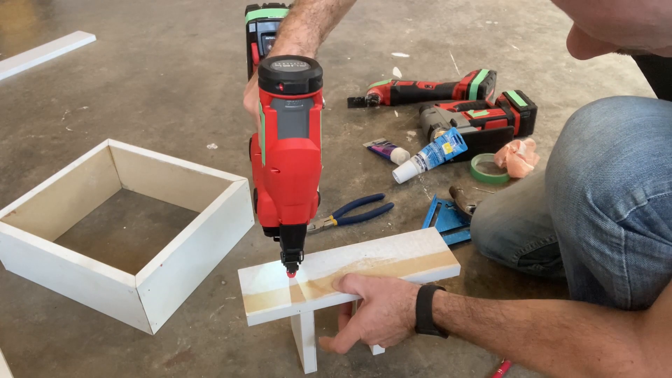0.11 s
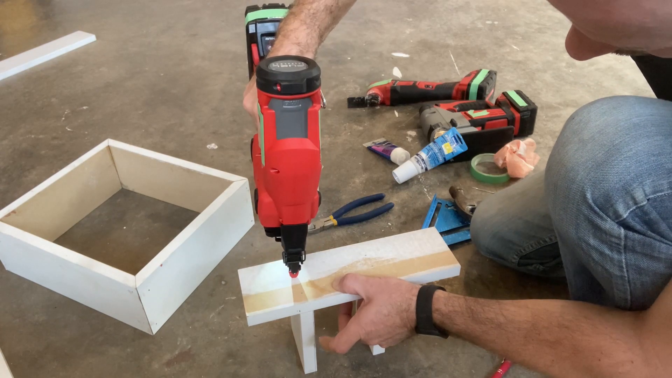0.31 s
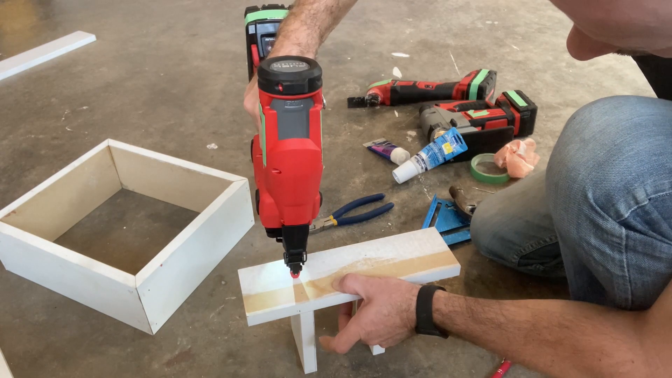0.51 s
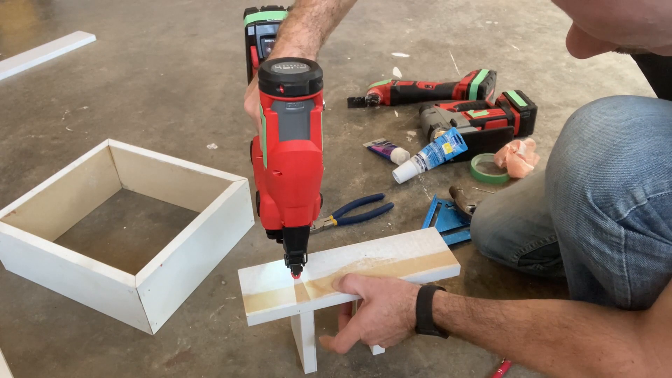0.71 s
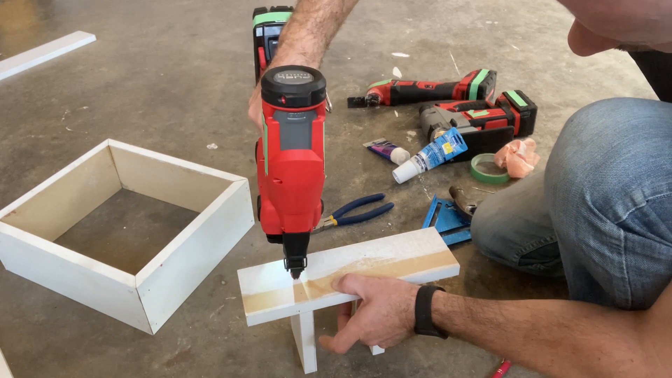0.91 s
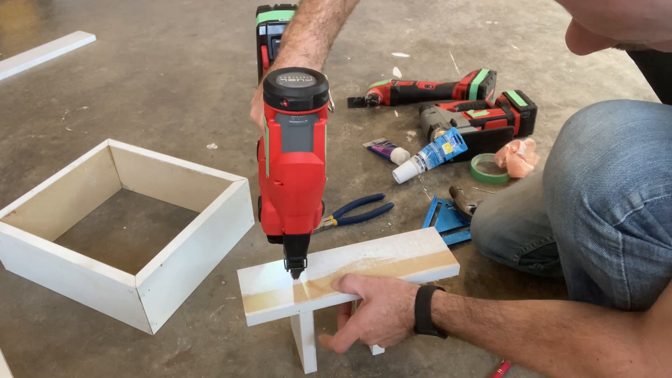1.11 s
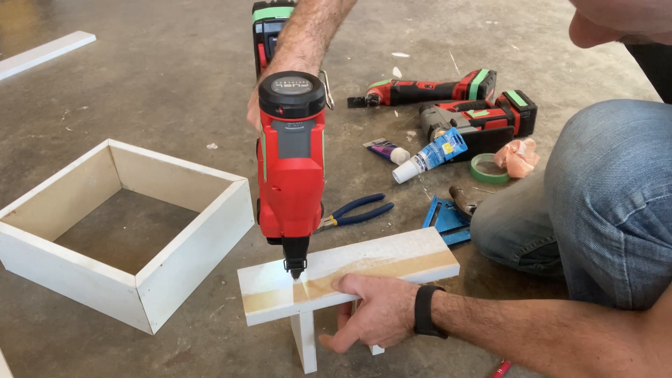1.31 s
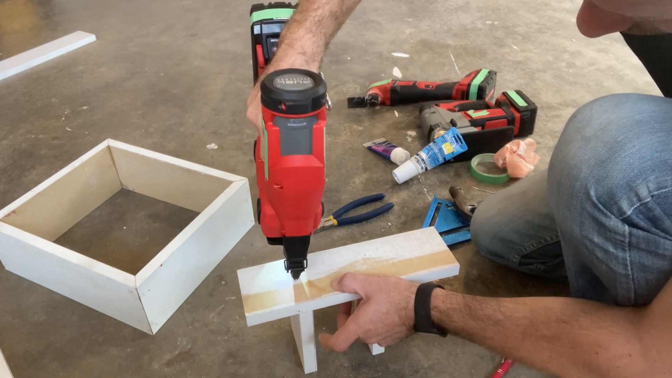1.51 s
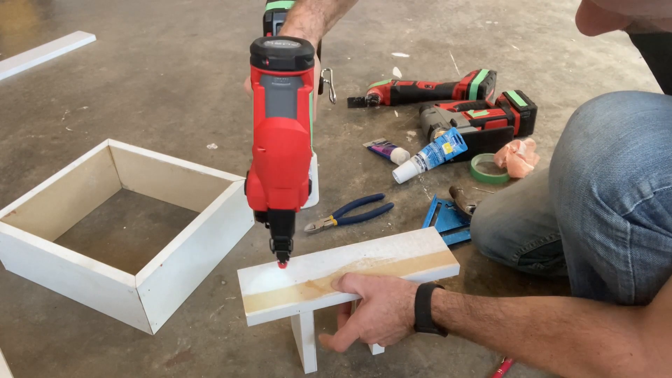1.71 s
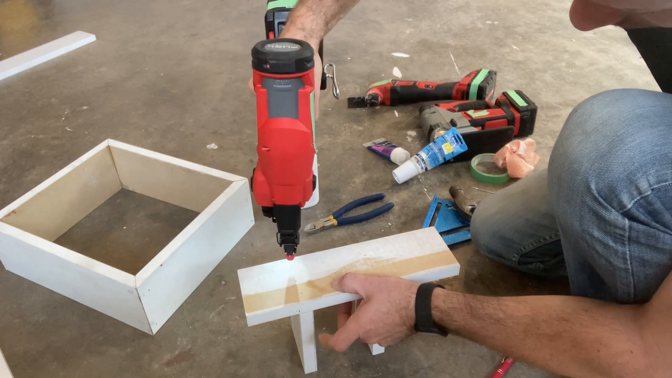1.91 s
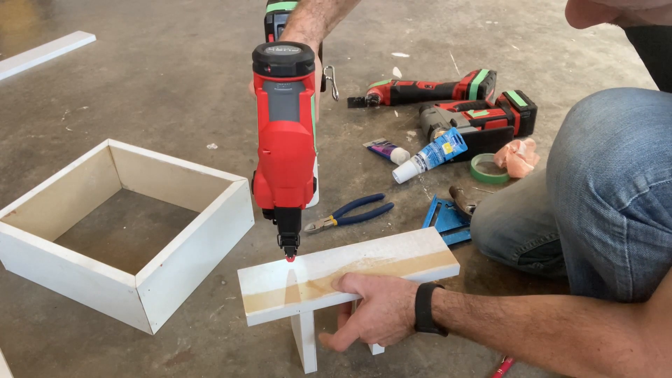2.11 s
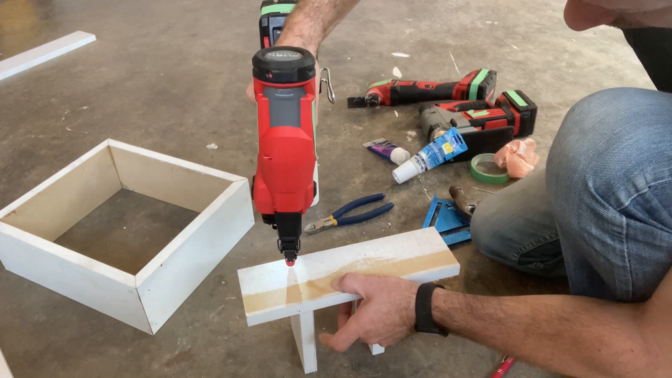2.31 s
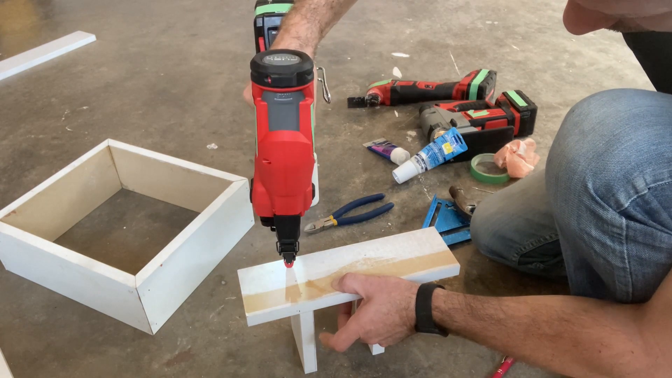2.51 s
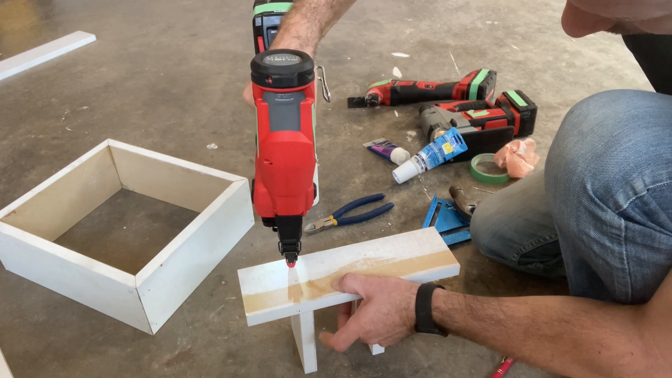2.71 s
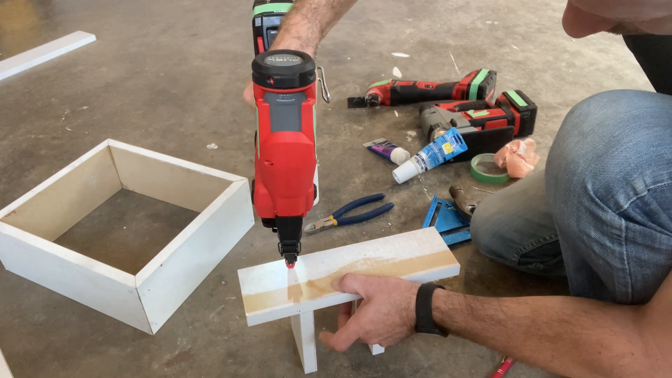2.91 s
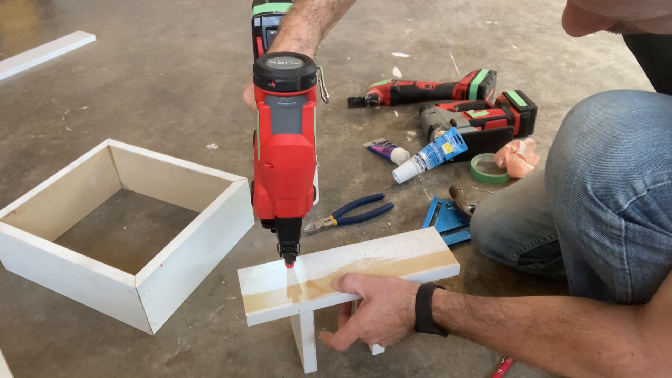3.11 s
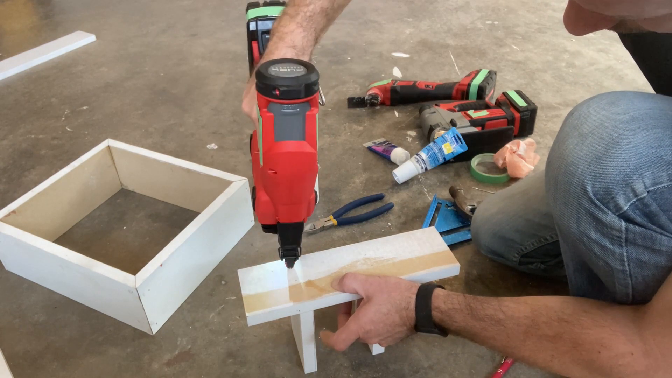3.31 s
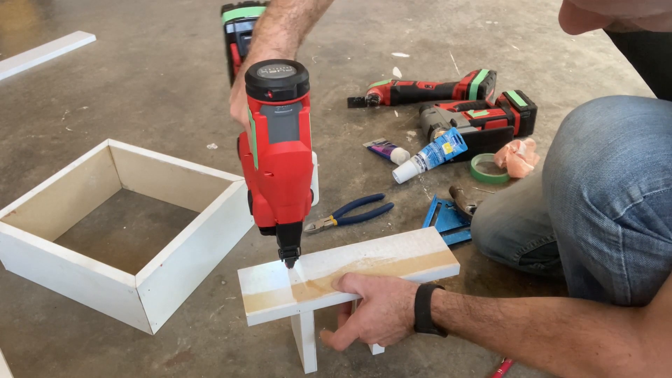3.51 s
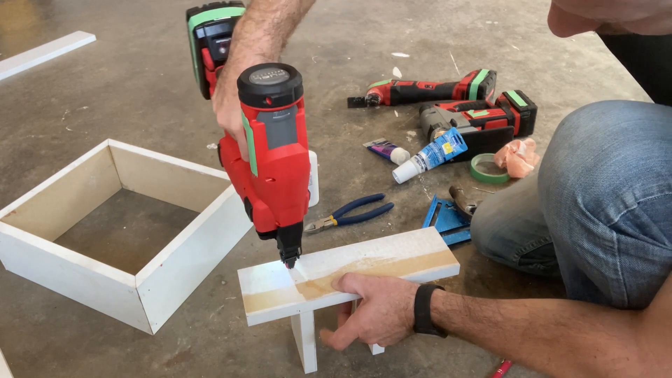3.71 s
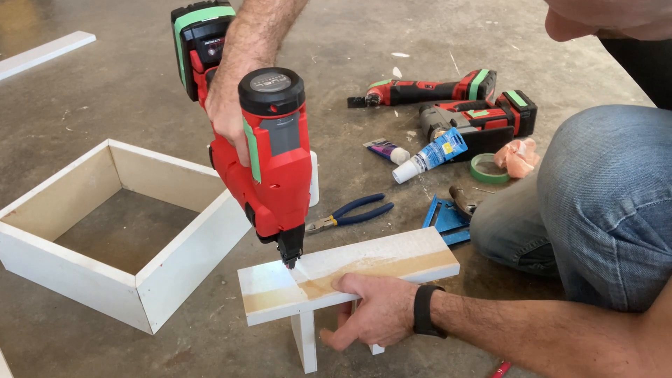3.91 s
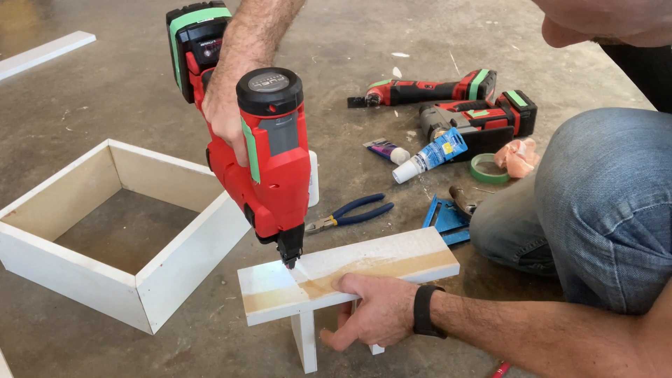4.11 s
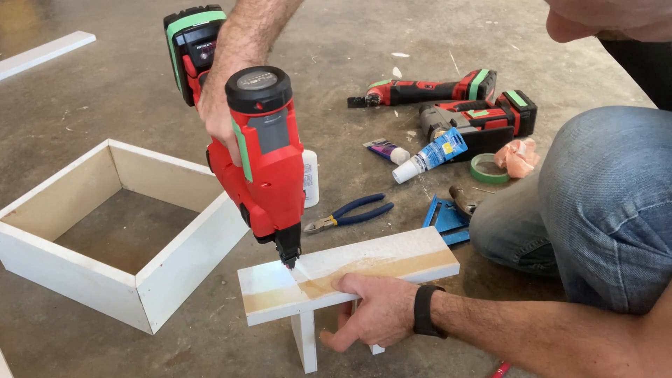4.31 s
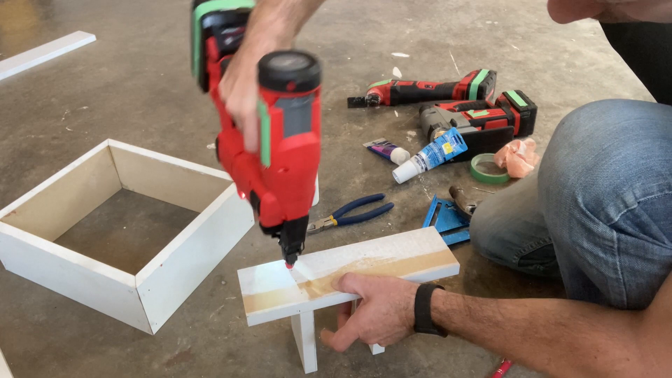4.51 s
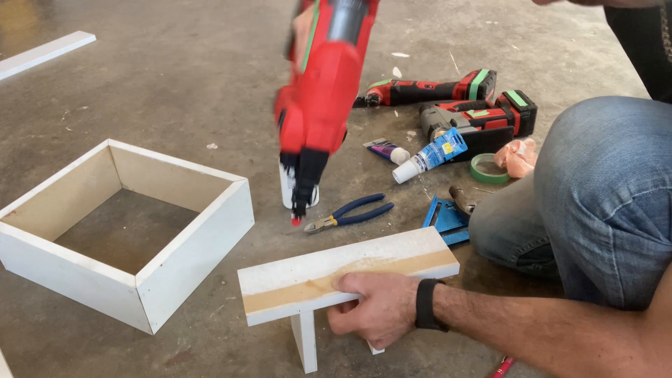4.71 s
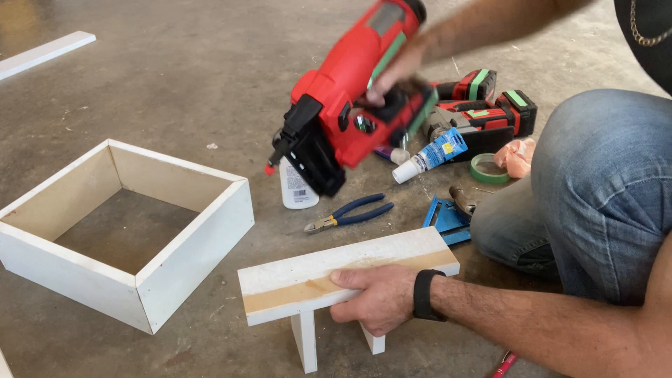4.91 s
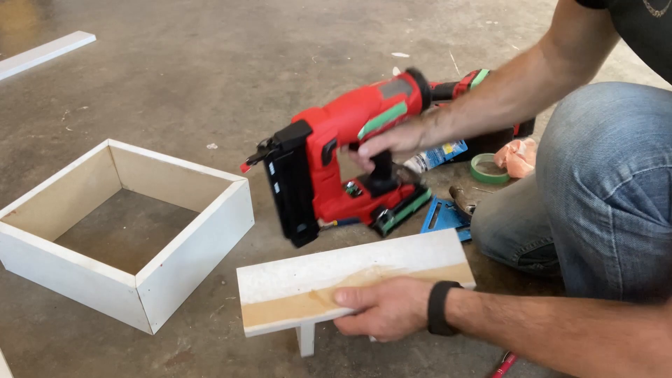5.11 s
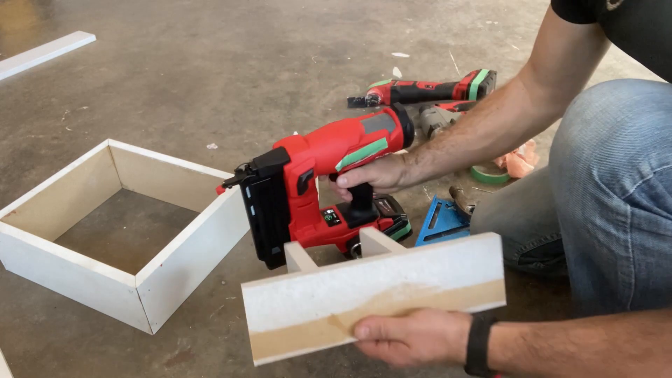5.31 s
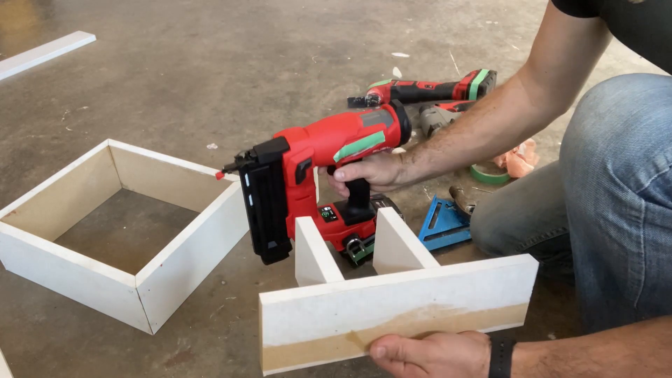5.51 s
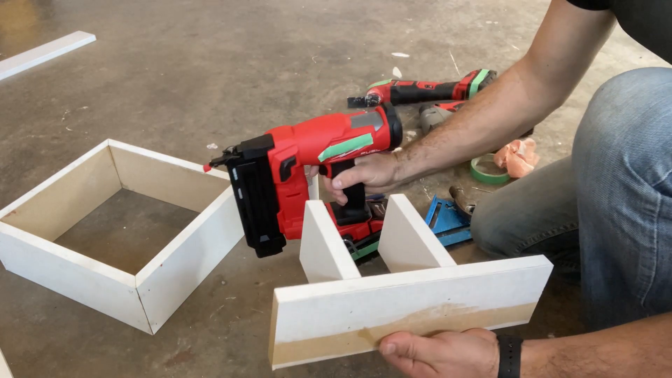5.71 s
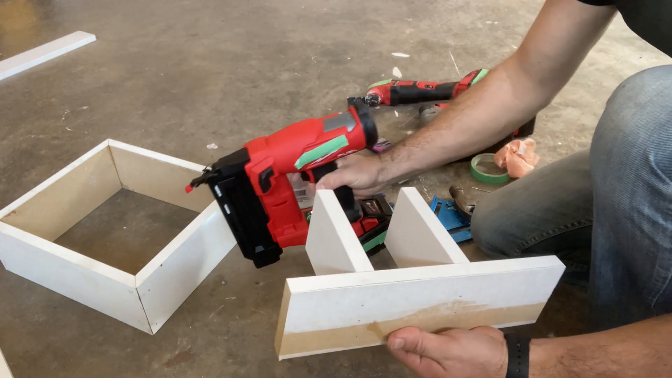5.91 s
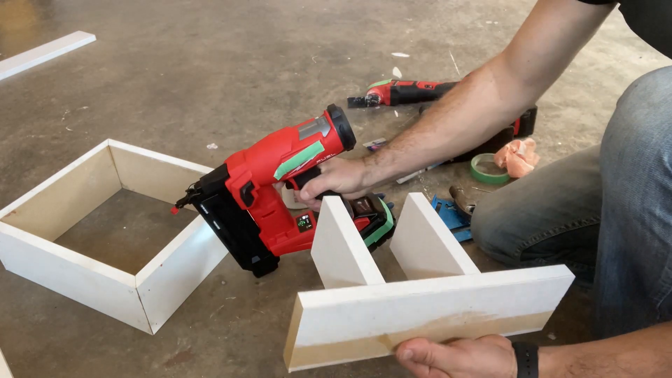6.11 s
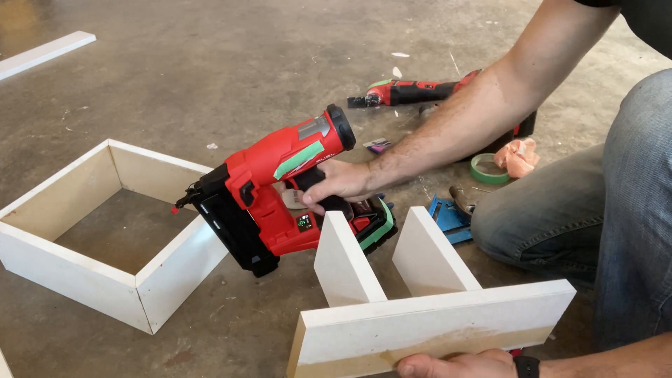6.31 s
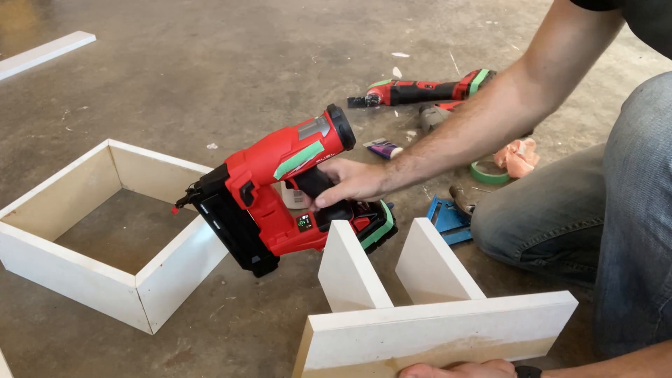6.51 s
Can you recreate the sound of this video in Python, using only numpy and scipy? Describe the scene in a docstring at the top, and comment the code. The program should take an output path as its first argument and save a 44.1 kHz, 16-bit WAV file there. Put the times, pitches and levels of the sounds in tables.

```python
"""A bare, echoing room with a concrete floor, still air and a faint hum; a cordless nailer close to two microphones.
First the plastic shell clicks in the hand, and the nose knocks and scuffs on a wooden frame.
A trigger click, then a shot: the drive kicks in, the driver slams, gears rattle, the mechanism snaps, runs on and
stops with a clack. More clicks and knocks lead to a second shot; then tool and frame bump and slide on the floor.
Each echo is filtered noise; a limiter holds the shots down and lets the echo swell back up."""
import sys
import numpy as np
from scipy import signal
from scipy.fft import rfft, irfft, next_fast_len
from scipy.io import wavfile
from scipy.ndimage import uniform_filter1d, minimum_filter1d

SR = 44100
rng = np.random.default_rng(int(sys.argv[2]) if len(sys.argv) > 2 else 0)


def wrap_up_sound(samples):
    """Save the sound to the file named by the first command line argument, as 16-bit audio."""
    columns = np.atleast_2d(samples).T
    # keep every value between -1 and 1, then stretch to whole-number steps
    tamed = np.clip(columns, -1, 1)
    steps = np.round(tamed * 32767).astype(np.int16)
    wavfile.write(sys.argv[1], SR, steps)


N = 288855


def amp(db):
    """Turns dB into an amplitude factor."""
    return 10 ** (np.asarray(db) / 20)


def evened(x):
    """Scales to rms 1."""
    return x / np.sqrt(np.mean(x ** 2) + 1e-20)


def read(points, hz):
    """Reads a table on a log-frequency axis."""
    f, value = np.transpose(points)
    return np.interp(np.log(hz + 1), np.log(f + 1), value)


def add(mix, s, sound):
    """Mixes a stereo sound in at time s."""
    part = mix[:, max(round(s * SR), 0):][:, :sound.shape[-1]]
    part += sound[..., :part.shape[1]]


def noise_pair(likeness, size):
    """White noise at two microphones, alike as far as the table says."""
    a, b = rfft(rng.standard_normal((2, size)))
    same = np.clip(read(likeness, np.fft.rfftfreq(size, 1 / SR)), -1, 1)
    common = a * np.sqrt((1 + same) / 2)
    apart = b * np.sqrt((1 - same) / 2)
    return irfft(np.array([common + apart, common - apart]), size)


def coloured(x, spectrum, tilt_db=0, size=4096):
    """Causal minimum-phase filter with the given spectrum, tilted by so many dB an octave about 1 kHz."""
    hz = abs(np.fft.fftfreq(size, 1 / SR))
    octaves = np.log2(np.maximum(hz, 60) / 1000)
    log_gain = np.log(amp(read(spectrum, hz) + tilt_db * octaves))
    taps = np.fft.ifft(np.exp(np.conj(signal.hilbert(log_gain)))).real
    return signal.oaconvolve(x, taps[None, :size // 2], axes=1)[:, :x.shape[1]]


def ring(modes, size=16384):
    """Dying sines, one a mode."""
    t = np.arange(size) / SR
    return sum(amp(db - 60 * t / t60) * np.sin(2 * np.pi * hz * t) for hz, db, t60 in modes)


# likeness of nearby sounds at the left and right microphone: (f/Hz, 0-1)
DIRECT_LIKENESS = [(100, 0.96), (600, 1), (2000, 0.79), (5000, 0.7), (12000, .6)]


def hits(rows, spectrum, rise, size=8192):
    """Each hit is a short burst of contact chatter; its level is its energy spread over 10 ms."""
    out, t = np.zeros((2, N)), np.arange(size) / SR
    for s, db, decay, tilt_db in rows:
        chatter = noise_pair(DIRECT_LIKENESS, size) * (1 - np.exp(-t / rise)) * np.exp(-t / decay)
        burst = evened(coloured(chatter, spectrum, tilt_db))
        add(out, s, amp(db) * np.sqrt(SR / 100 / size) * burst)
    return out


# likeness of air and echo at the left and right microphone: (f/Hz, 0-1)
DIFFUSE_LIKENESS = [(100, 0.91), (300, 0.27), (700, 0.17), (1500, .05), (12000, 0.068)]
# colour of the room air: (f/Hz, relative level/dB per Hz); its overall level/dB
AIR_COLOUR = [(12, -44), (20, -9), (116, -9), (198, -17), (434, -23), (1220, -22), (1810, -36), (2260, -38),
              (2820, -41.5), (3840, -35), (6910, -43.5), (9670, -38.5), (11400, -49), (13900, -38),
              (16000, -66.5)]
AIR_DB = -67
# the hum as it swells: (t/s, level/dB)
HUM_LEVEL = [(0, -79.5), (2.8, -84), (3.2, -71), (3.7, -65.5), (4.2, -72.5), (5.2, -72.5), (6.5, -75)]


def background(hum_hz=102, waver_hz=3):
    """Still room air as coloured noise, and a faint low sine that swells and wavers in pitch."""
    air = amp(AIR_DB) * evened(coloured(noise_pair(DIFFUSE_LIKENESS, N), AIR_COLOUR))
    pitch = hum_hz + waver_hz * evened(uniform_filter1d(rng.standard_normal(N), size=3000))
    level = amp(np.interp(np.arange(N) / SR, *np.transpose(HUM_LEVEL)))
    return air + level * np.sqrt(2) * np.sin(2 * np.pi * np.cumsum(pitch) / SR)


# how long the room rings in each band: (f/Hz, t60/s)
ROOM_DECAY = [(100, 0.1), (260, 0.74), (700, 0.71), (1800, 0.763), (4800, 0.73), (8500, 0.5721),
              (13000, 0.2965)]
# echo of each band, before the build-up and the far walls: (f/Hz, level/dB)
ROOM_LEVEL = [(60, -14), (180, -9.5), (450, -1.5), (1500, -3), (4800, -2), (9000, -4), (14000, -7)]


def room(x, build=0.0092, wall_s=0.046, wall_width=0.011, wall_db=3, size=65536):
    """A diffuse tail builds up and dies band by band; the far walls' return lifts it for a moment."""
    hz, t, z = signal.stft(noise_pair(DIFFUSE_LIKENESS, size), SR, nperseg=512)
    t60 = read(ROOM_DECAY, hz)[:, None]
    unit_energy = np.sqrt(np.log(1e6) / t60 / SR)  # so that a long decay is not louder
    z = z * amp(read(ROOM_LEVEL, hz)[:, None] - 60 * t / t60) * unit_energy
    tail = signal.istft(z, SR, nperseg=512)[1][:, :size]
    t = np.arange(size) / SR
    wall_return = amp(wall_db * np.exp(-((t - wall_s) / wall_width) ** 2))
    tail = tail * (1 - np.exp(-t / build)) * wall_return
    return signal.oaconvolve(x, tail, axes=1)[:, :N]


# the frame slides briefly on the concrete: (t/s at the loudest, half width/s, level/dB before the handling level)
SLIDE_TIMES = [(5.735, 0.029, -75), (6.435, 0.033, -63.5)]
# colour of wood on grit: (f/Hz, relative level/dB)
GRIT_COLOUR = [(200, -15.5), (700, -0.5), (2000, 5.5), (6500, -8), (9500, -3), (11400, -15), (13500, 1),
               (16000, -14)]


def slides():
    """Wood rubs over grit: a soft hiss that swells and fades."""
    t = np.arange(N) / SR
    level = sum(amp(db) * np.exp(-((t - s) / width) ** 2) for s, width, db in SLIDE_TIMES)
    return level * evened(coloured(noise_pair(DIRECT_LIKENESS, N), GRIT_COLOUR))


# tool and frame bump on the floor and rock back, levels before the handling level:
# (t/s, level/dB, decay/s, delay of the rock/s, level of the rock/dB)
FLOOR_BUMPS = [(5.3880, -34.5, 0.013, .0475, -41.5), (5.6590, -48.5, 0.02, 0.021, -42.5),
               (5.7920, -51.5, 0.035, 0.04, -49.5), (6.17, -33.5, 0.01, .0565, -37.5),
               (6.1850, -29.5, 0.011, .060, -37)]
# colour of the concrete floor, before the tilts: (f/Hz, relative level/dB)
SLAB_COLOUR = [(25, -30), (65, 3), (130, 2), (230, -1.5), (450, -8), (900, -11.5), (1600, -17.5),
               (3500, -31.5), (9000, -53.5)]
BUMP_TILT_DB, ROCK_TILT_DB, ROCK_DECAY_S = 1.3, -7, 0.029  # tilts in dB per octave


def floor_bumps():
    """Each thing put down lands on one edge, then rocks back with a duller thud."""
    landings = [(s, db, decay, BUMP_TILT_DB) for s, db, decay, _, _ in FLOOR_BUMPS]
    rocks = [(s + lag, rock_db, ROCK_DECAY_S, ROCK_TILT_DB) for s, _, _, lag, rock_db in FLOOR_BUMPS]
    return hits(landings + rocks, SLAB_COLOUR, rise=0.0013)


# the nose nudges the board and its tip scuffs the wood, levels before the handling level:
# (t/s, knock level/dB, decay/s, note of the board there f/Hz, scuff level/dB)
NOSE_NUDGES = [(0.863, -58.5, 0.02, 426, -62), (0.888, -50.5, 0.016, 348, -60),
               (0.9296, -48.5, .005, 509, -58), (2.9100, -60, .011, 688, -58),
               (2.9360, -59.5, 0.0045, 534, -59), (3.1710, -50, .006, 580, -56),
               (3.4103, -46.5, .009, 472.7, -62.5)]
# colour of the board's knock, before the tilt: (f/Hz, relative level/dB)
BOARD_COLOUR = [(100, -19), (250, -5), (350, -3.5), (520, 2), (800, -9.5), (1300, -8.5), (3000, -25),
                (8000, -42.5)]
# colour of the plastic tip and shell, before the tilts: (f/Hz, relative level/dB)
PLASTIC_COLOUR = [(100, -20.5), (400, -4), (800, -2.5), (1300, -0.5), (2100, 3.5), (3200, -0.5),
                  (4600, -2.5), (6500, -14.5), (9500, -11.5), (11400, -28), (13500, -19), (16000, -23.5)]
TIP_DECAY_S, TIP_TILT_DB, KNOCK_TILT_DB = 0.021, -2, -1  # tilts in dB per octave
BOARD_RING_DB = 4.5  # the board's note, against the knock


def nose(rise=0.0015):
    """The nose is set on the wood: the board knocks with a short hollow note, and the plastic tip scuffs over it."""
    knocks = [(s, db, decay, KNOCK_TILT_DB) for s, db, decay, _, _ in NOSE_NUDGES]
    out = hits(knocks, BOARD_COLOUR, rise=0.0013)
    t = np.arange(SR // 10) / SR
    for s, db, decay, hz, _ in NOSE_NUDGES:
        envelope = (1 - np.exp(-t / rise)) * np.exp(-t / decay)
        add(out, s, amp(db + BOARD_RING_DB) * envelope * np.sin(2 * np.pi * hz * t))
    scuffs = [(s, scuff_db, TIP_DECAY_S, TIP_TILT_DB) for s, _, _, _, scuff_db in NOSE_NUDGES]
    return out + hits(scuffs, PLASTIC_COLOUR, rise=0.0067)


# the driver lands: t/s
SHOT_TIMES = [1.4055, 4.3025]
# single clicks of the plastic shell, mostly in the hand; those at 2.937 s and 3.174 s are the tip striking the
# board: (t/s, level/dB before the handling level, tilt/dB per octave)
SHELL_CLICKS = [(.4385, -59, 4.5), (.506, -62, -4.5), (0.6954, -56, 5), (0.7238, -51.5, -3),
                (1.2436, -67.5, 1.5), (2.5520, -56.5, 4), (2.6546, -60, 1.5), (2.9370, -50, -1),
                (2.9956, -53.5, -0.5), (3.1740, -43, -1), (4.1120, -63, -1), (5.4820, -40.5, -5),
                (5.6650, -46.5, -4), (5.7970, -57.5, -6), (5.8280, -52.5, -7), (6.072, -64.5, 15.5)]
# quick plastic rattles as the nailer, then the frame, meets the floor: (t/s, number of clicks, gap/s, # first
# level/dB before the handling level, step from click to click/dB, tilt/dB per octave)
LANDING_RATTLES = [(5.3970, 4, .0056, -45, 1.13, -2), (6.168, 3, .0125, -40.5, -10.5, 3)]
# short ring of the plastic shell, before its ring level: (f/Hz, level/dB, t60/s)
SHELL_RING = [(1960, -4.5, .03), (3740, 0, 0.021), (4410, -2, 0.019)]
CLICK_DECAY_S = 0.0067
# the click of the trigger: s from each shot, level before the handling level, dB per octave
TRIGGER_S, TRIGGER_DB, TRIGGER_TILT_DB = -.0925, -56, 5


def shell(ring_db=-35):
    """Plastic clicks: single ones in the hand or of the tip on the board, the trigger before each shot, and
    quick rattles on landing."""
    pulls = [(shot + TRIGGER_S, TRIGGER_DB, TRIGGER_TILT_DB) for shot in SHOT_TIMES]
    rattles = [(s + k * gap, db + k * step_db, tilt_db)
               for s, count, gap, db, step_db, tilt_db in LANDING_RATTLES for k in range(round(count))]
    rows = [(s, db, CLICK_DECAY_S, tilt_db) for s, db, tilt_db in SHELL_CLICKS + pulls + rattles]
    clicks = hits(rows, PLASTIC_COLOUR, rise=.001)
    return clicks + amp(ring_db) * signal.oaconvolve(clicks, ring(SHELL_RING)[None], axes=1)[:, :N]


# the frame jolted against the floor, before the bass cut and jolt level: (f/Hz, level/dB, t60/s)
FRAME_RING = [(68, -20, 0.24), (102, -9.5, .09), (138, -5, 0.056), (192, -8.5, 0.053), (290, -12, 0.11),
              (424, -13, 0.092), (558, -16, 0.044)]


def frame(jolt_db=1, lag=0.0052, low_hz=82):
    """The nail shoves the frame down: a low thud just after the crack, with no deep bass."""
    bass_cut = signal.butter(2, low_hz, "high", fs=SR, output="sos")
    thud = signal.sosfilt(bass_cut, ring(FRAME_RING))
    out = np.zeros((2, N))
    for s in SHOT_TIMES:
        add(out, s + lag, -amp(jolt_db) * thud)
    return out


# the pawl slips over a few teeth twice in a cycle: (t/s after the driver lands, gap between teeth/s, level/dB)
PAWL_RUNS = [(.0660, .0138, -21.5), (.1730, .0185, -22)]
# colour of a tooth tick: (f/Hz, relative level/dB)
TOOTH_COLOUR = [(200, -33), (1500, -5.5), (5000, -3.5), (10000, -1.5), (11400, -11.5), (13000, 8.5),
                (16000, -4)]


def ratchet(decay=0.00088, count=3):
    """A pawl ticks over evenly spaced teeth while the drive turns."""
    ticks = [(shot + s + k * gap, db, decay, 0)
             for shot in SHOT_TIMES for s, gap, db in PAWL_RUNS for k in range(count)]
    return hits(ticks, TOOTH_COLOUR, rise=.0002)


# surges of the drive, on top of the idle level: (t/s after the driver lands, half width/s, level/dB)
DRIVE_SURGES = [(-.006, .012, -20), (.046, .024, -15), (.168, .034, -14)]
START_S, STOP_S = -.0355, .215  # the motor runs between these, after the driver lands
SPIN_UP_S, COAST_S, IDLE_DB = 0.0079, 0.017, -28  # IDLE_DB holds between the surges
SPEED_PER_DB, COAST_SAG_PER_S = 0.2, 11  # faster in a surge, slower once the motor is off


def effort(t):
    """Level and relative speed of the drive, t seconds after the driver lands: it fades in, surges and coasts to rest."""
    load = amp(IDLE_DB) + sum(amp(db) * np.exp(-((t - s) / width) ** 2) for s, width, db in DRIVE_SURGES)
    coasting = np.maximum(t - STOP_S, 0)
    level = load * np.clip((t - START_S) / SPIN_UP_S, 0, 1) * np.exp(-coasting / COAST_S)
    surge_speed = 1 + SPEED_PER_DB * (20 * np.log10(load) - IDLE_DB)
    return level, surge_speed * np.exp(-COAST_SAG_PER_S * coasting)


# colour of the grinding teeth: (f/Hz, relative level/dB)
GEAR_COLOUR = [(200, -14.5), (500, -4), (750, 4), (1050, -2.5), (1700, 1.5), (4000, 1), (6500, -5),
               (10000, -4.5), (11400, -20), (13000, -13), (16000, -19.5)]
# gear tones: (f/Hz at speed 1, level/dB against the grind)
GEAR_WHINE = [(760, -12), (1200, -24.5), (1950, -8.5), (3600, -7)]


def drive(mesh_hz=310, rattle=.6, waver=0.037, grain_db=3):
    """Gear teeth rattle and whine, following the drive's speed, while the motor compresses the air spring."""
    out = np.zeros((2, N))
    t = np.arange(-SR // 20, SR // 4) / SR
    level, speed = effort(t)
    for shot in SHOT_TIMES:
        wobble = evened(uniform_filter1d(rng.standard_normal(len(t)), size=120))
        travel = np.cumsum(speed * (1 + waver * wobble)) / SR
        uneven = amp(grain_db * evened(uniform_filter1d(rng.standard_normal(len(t)), size=70)))
        meshing = uneven * (1 + rattle * np.cos(2 * np.pi * mesh_hz * travel))
        grind = evened(coloured(noise_pair(DIRECT_LIKENESS, len(t)) * meshing, GEAR_COLOUR))
        whine = 0
        for hz, tone_db in GEAR_WHINE:
            phase = rng.random((2, 1))  # its own at each microphone
            whine = whine + amp(tone_db) * np.sqrt(2) * np.sin(2 * np.pi * (hz * travel + phase))
        add(out, shot + t[0], level * (grind + whine))
    return out


# steel blows of one firing cycle, alike in every shot: (t/s after the driver lands, level/dB, decay/s,
# tilt/dB per octave). In order: the switch closes, the drive engages and takes up its slack, the driver hits
# the nail and bottoms out, the tool recoils, the mechanism snaps over, the drive stops
FIRING_CYCLE = [(-.0575, -49, .0035, 0), (-.0378, -30, .002, 4.5), (-.0335, -22.5, 0.0034, 4.5),
                (0, -2, .005, -0.8), (.0035, -6, 0.0058, -4), (.0375, -16.5, .0045, -3.5),
                (0.1136, -0.5, .003, 0.66), (.222, -17, 0.0032, -1)]
# colour of those blows, before the tilt: (f/Hz, relative level/dB)
STEEL_COLOUR = [(60, -26), (200, -9.5), (400, -6.5), (750, 3.5), (1050, -3), (1700, 4), (3200, -1),
                (4800, 2), (6500, -8), (9000, 1), (10500, -7.5), (11400, -17.5), (13000, -3), (16000, -18)]
# ring of the nailer's housing and magazine, before its ring level: (f/Hz, level/dB, t60/s)
HOUSING_RING = [(765, 2, 0.23), (997, -4, 0.37), (1210, -7.5, 0.23), (1276, -7, .25), (1347, -6.5, 0.27),
                (1606, -6, 0.31), (1638, -5.5, 0.37), (2052, 1.5, 0.19), (2402, -4, 0.17),
                (2496, -0.5, 0.1), (2840, -3, 0.1), (3940, -2.5, 0.091), (4500, -1.5, 0.33),
                (5030, -1, 0.096)]


def blows(ring_db=-52):
    """Steel strikes steel in the same order in every shot, and the housing rings on."""
    rows = [(shot + s, db, decay, tilt_db) for shot in SHOT_TIMES for s, db, decay, tilt_db in FIRING_CYCLE]
    strikes = hits(rows, STEEL_COLOUR, rise=.0012)
    return strikes + amp(ring_db) * signal.oaconvolve(strikes, ring(HOUSING_RING)[None], axes=1)[:, :N]


HANDLING_DIRECT_DB, HANDLING_ECHO_DB = -0.5, 0.5  # handling levels: direct, and into the room


def scene():
    """The nailer and the handling, close by, with the room's echo and air."""
    handling = slides() + floor_bumps() + nose() + shell()
    nailer = frame() + ratchet() + drive() + blows()
    echo = room(nailer + amp(HANDLING_ECHO_DB) * handling)
    return background() + echo + amp(HANDLING_DIRECT_DB) * handling + nailer


def limited(x, ceiling_db=-11, recover_db_per_s=65, size=900):
    """A look-ahead limiter: ducks just before each peak and recovers slowly."""
    power_db = 10 * np.log10(abs(uniform_filter1d((x ** 2).mean(0), size=300)) + 1e-12)
    fall = np.arange(N) / SR * recover_db_per_s
    held_peak_db = np.maximum.accumulate(power_db + fall) - fall
    over_db = np.maximum(held_peak_db - ceiling_db, 0)
    return x * amp(uniform_filter1d(minimum_filter1d(-over_db, size), size))


# unequal microphone ports: (f/Hz, left minus right level/dB)
MICROPHONE_BALANCE = [(30, 1), (80, 3), (160, 1.5), (300, 0), (600, -0.5), (1400, -1.56), (4500, 0.26),
                      (12000, 0)]
EDGE_HZ = 16000  # upper band limit


def record(dry):
    """Two unequal microphone ports, the limiter, overload and the band limit."""
    size = next_fast_len(N)
    half_db = read(MICROPHONE_BALANCE, np.fft.rfftfreq(size, 1 / SR)) / 2
    ports = irfft(rfft(dry, size) * amp([half_db, -half_db]), size)[:, :N]
    held = np.clip(limited(ports), -1, 1)
    band_limit = signal.firwin(255, EDGE_HZ, window=("kaiser", 9), fs=SR)
    return signal.oaconvolve(held, band_limit[None], "same")


dry = scene()
out = record(dry)
wrap_up_sound(out)
```